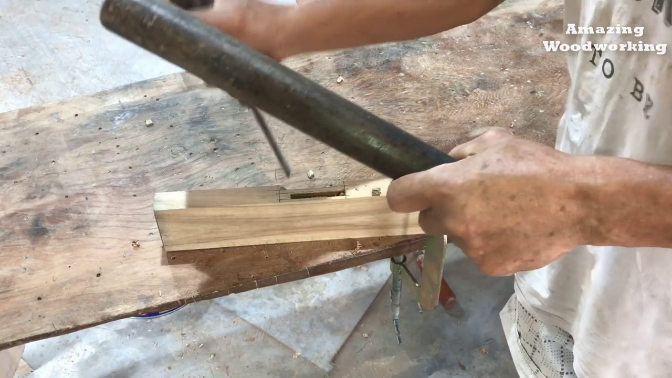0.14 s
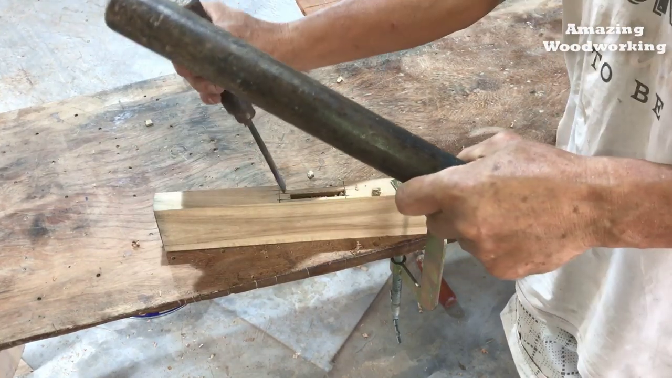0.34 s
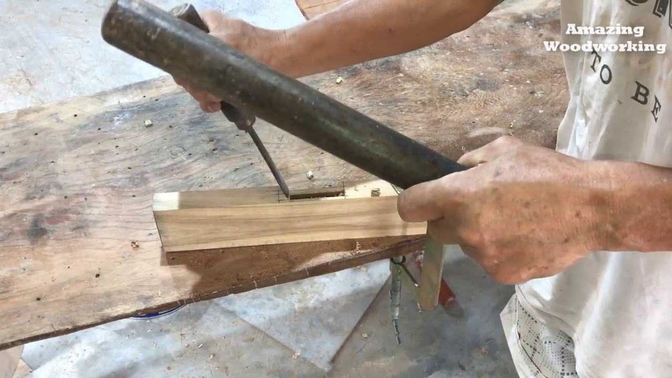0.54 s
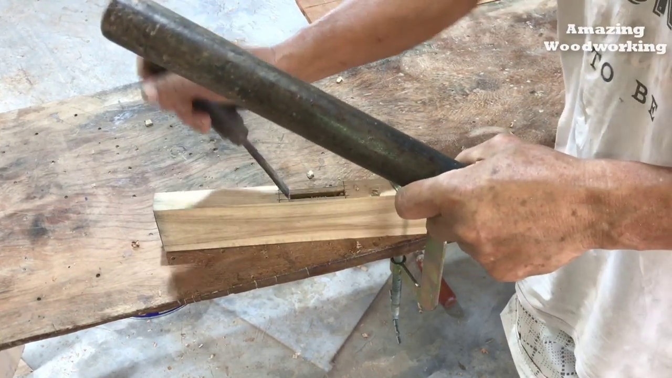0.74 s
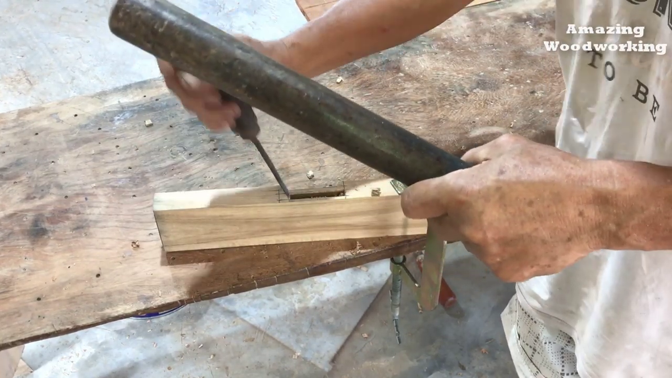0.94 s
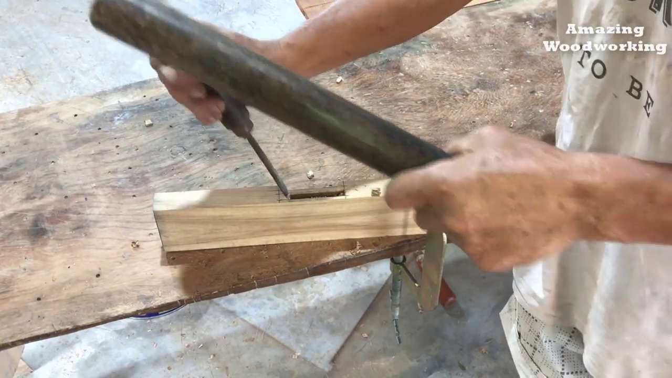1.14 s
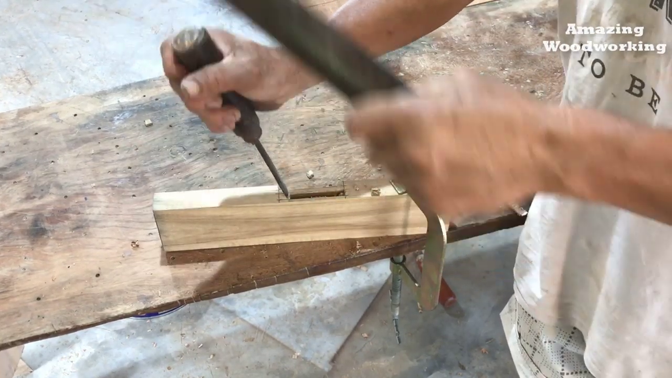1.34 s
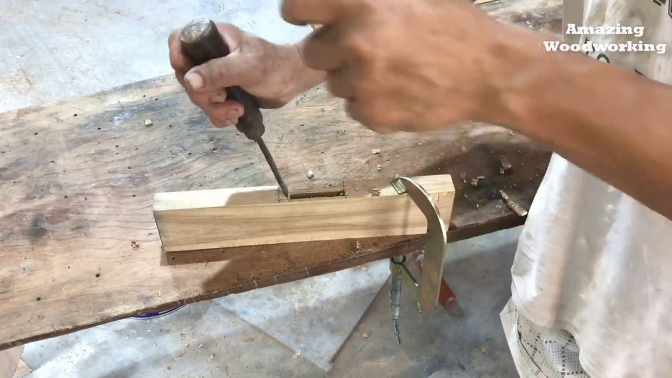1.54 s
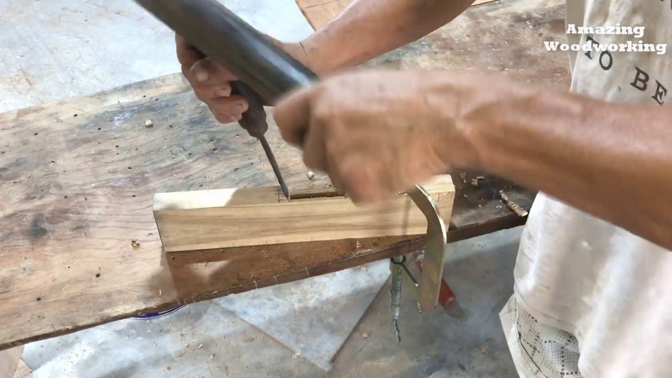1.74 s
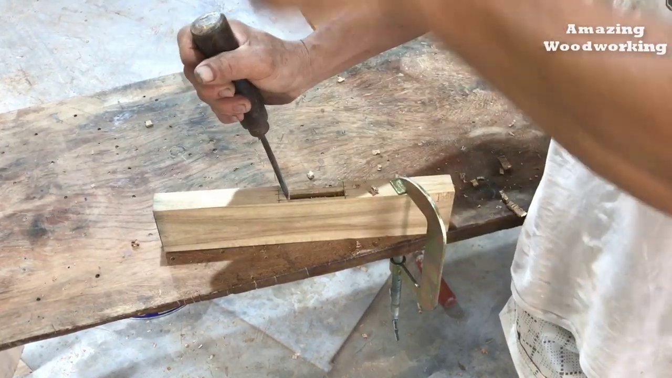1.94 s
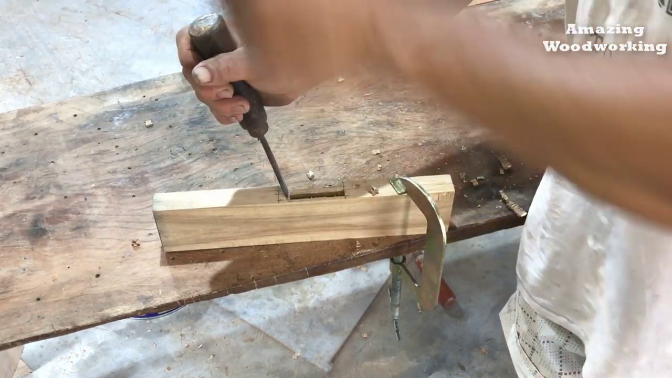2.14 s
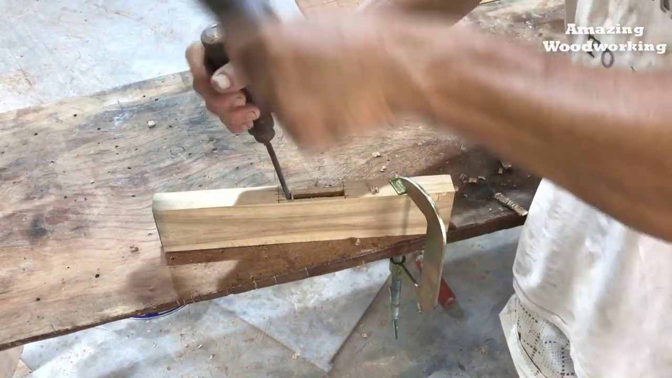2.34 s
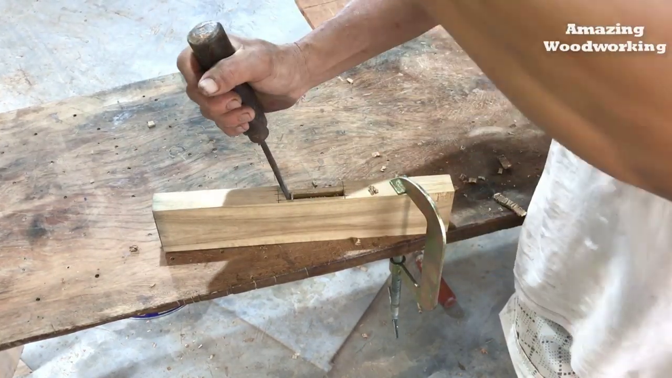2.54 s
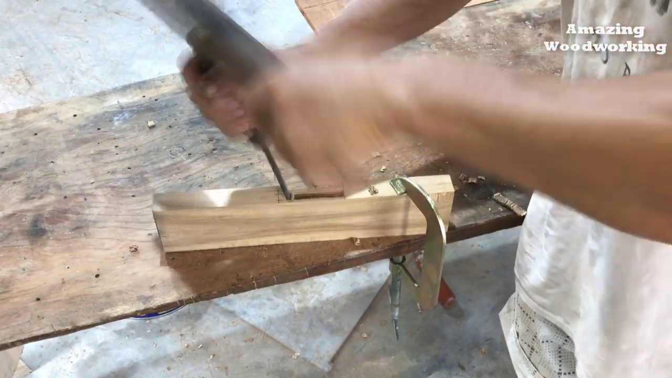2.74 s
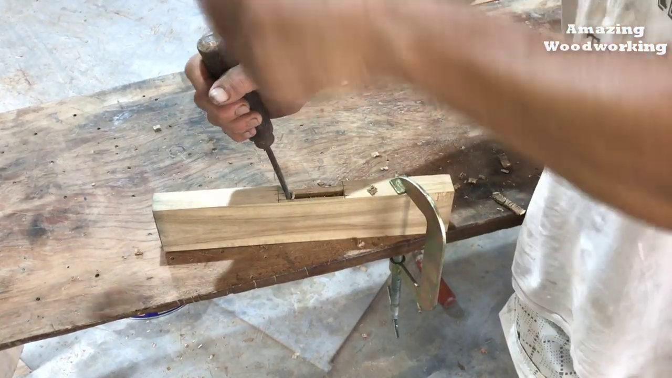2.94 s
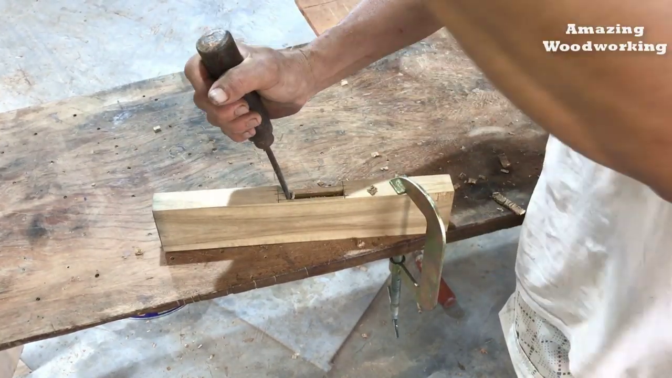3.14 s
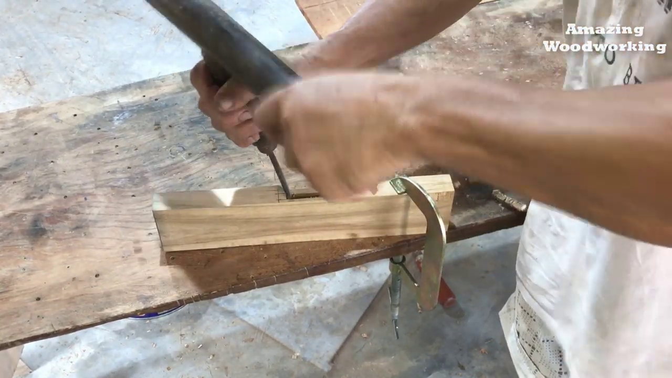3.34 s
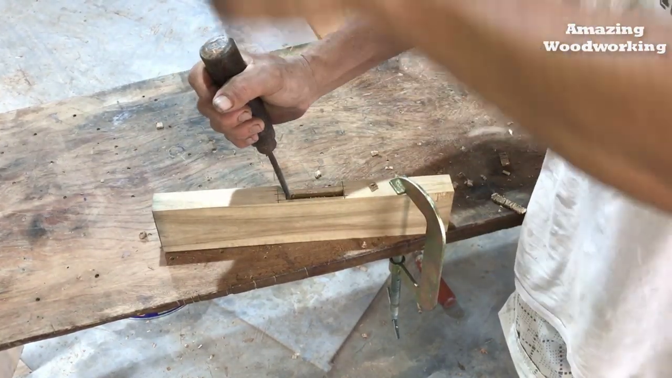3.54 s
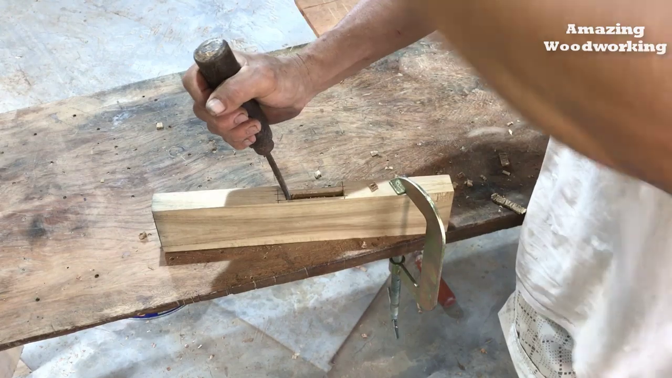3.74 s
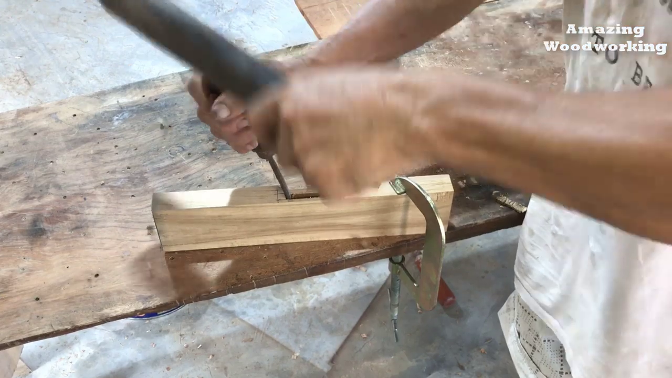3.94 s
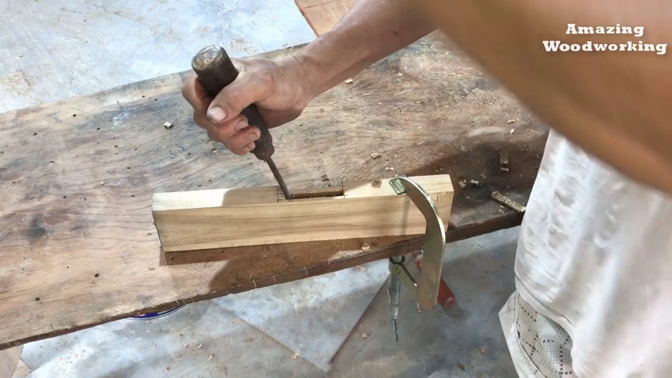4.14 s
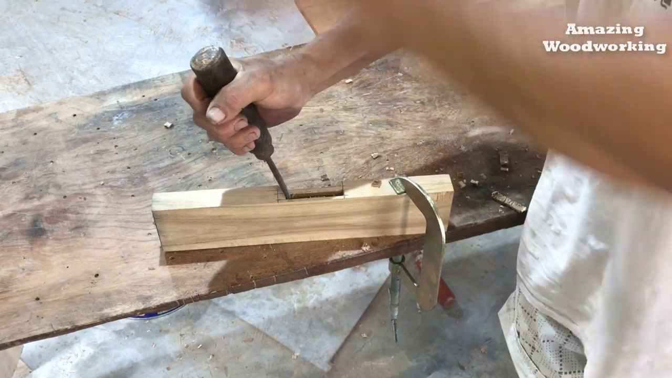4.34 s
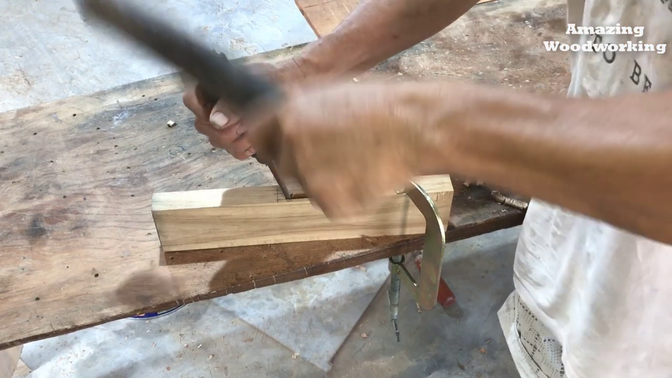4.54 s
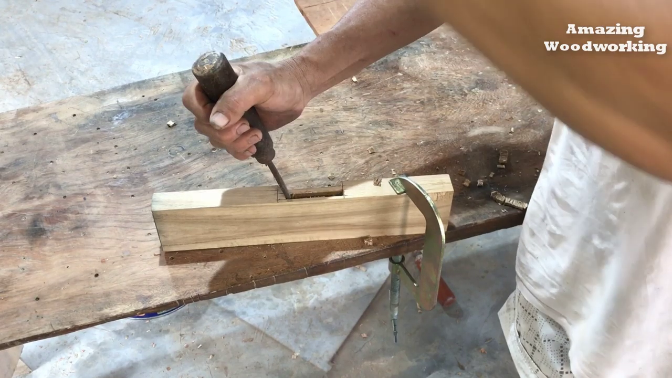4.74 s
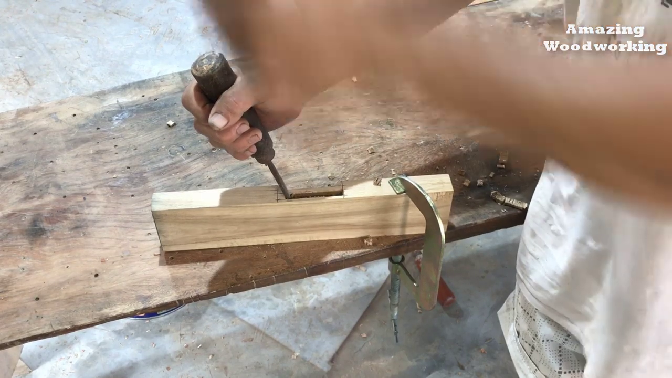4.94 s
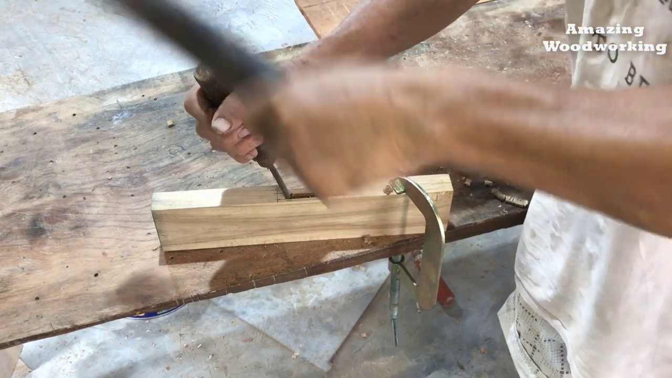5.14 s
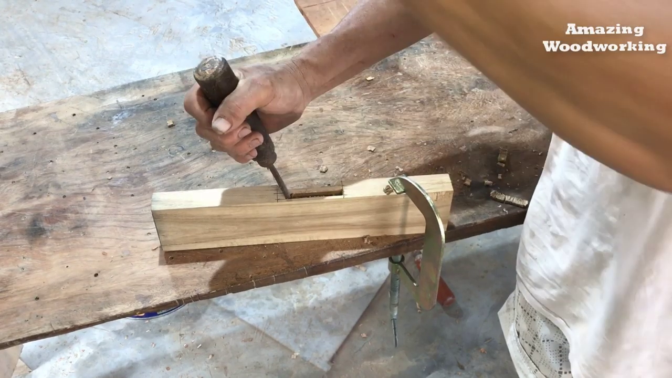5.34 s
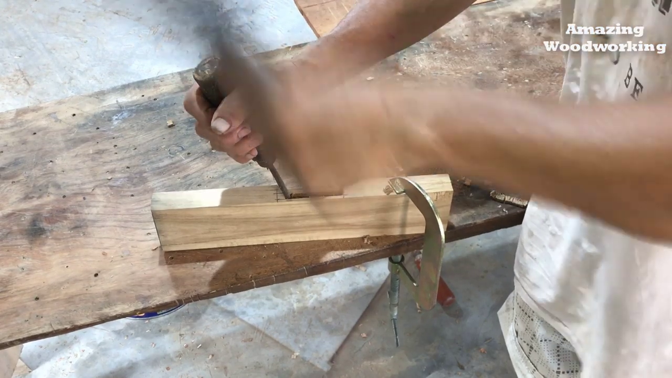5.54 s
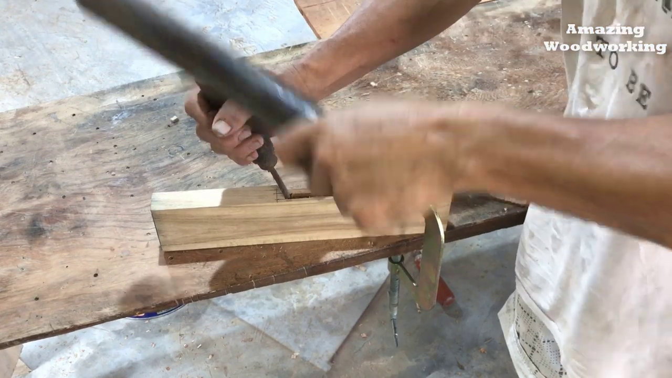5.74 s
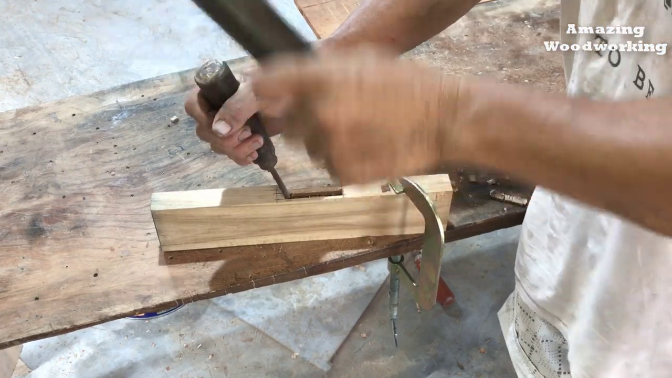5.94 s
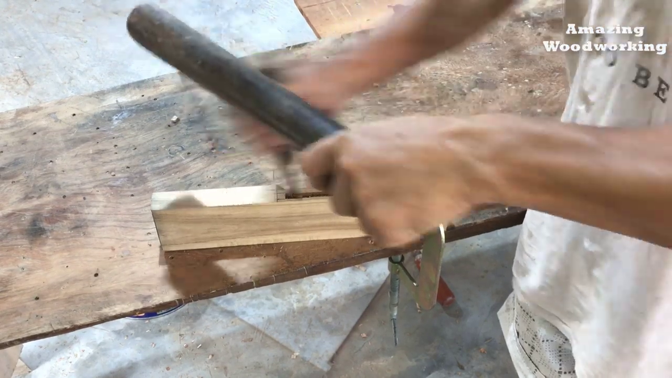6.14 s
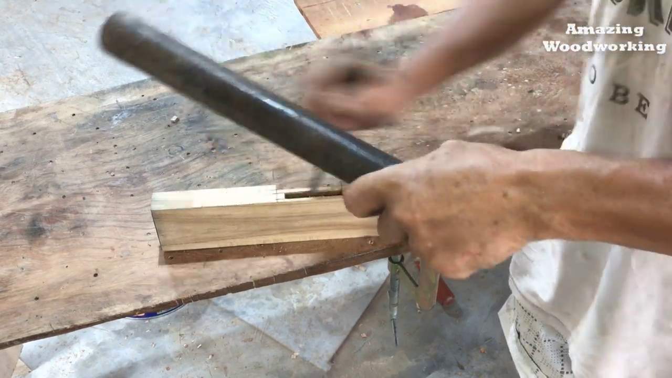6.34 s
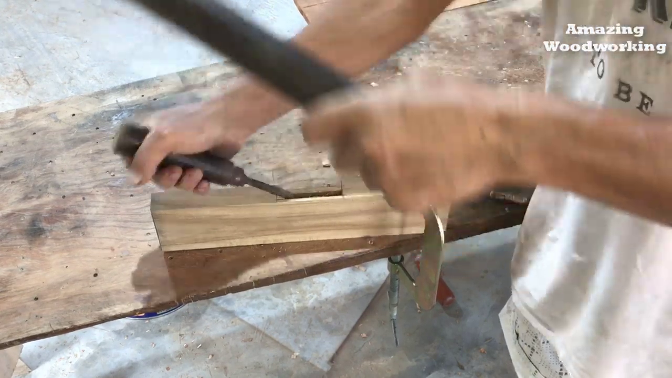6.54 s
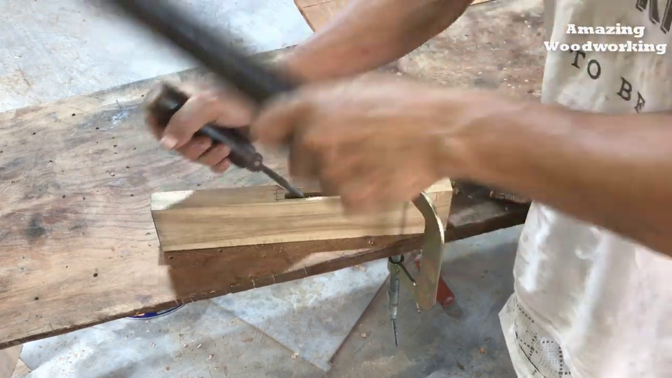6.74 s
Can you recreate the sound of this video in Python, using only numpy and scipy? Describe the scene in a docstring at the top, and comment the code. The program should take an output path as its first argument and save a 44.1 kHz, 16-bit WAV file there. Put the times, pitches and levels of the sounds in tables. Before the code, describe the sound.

A close microphone above a timber bench in a hard-walled workshop picks up soft air, low rumble and a thin far whine. At 0 to 0.25 s a very faint, distant two-note hoot rises slightly in pitch. Light, dull touches of a chisel on wood come at about 0.25, 0.35 and 0.65 s, with low rustles of arm movement around 1.1 to 1.5 s. From 1.7 s a heavy bar hits the chisel nine times, roughly every 0.55 s until 6.05 s. Each loud blow is an abrupt crack with a short, pitched knock, handle ring, glinting steel and a slightly delayed low bench boom, then half a second of room tail. The first and ninth are more glancing and metallic; the background ducks after the peaks. At 6.45 s the blade levers with a short woody crunch, and at 6.8 s a much weaker strike follows with little boom.

```python
"""A faint far hoot in two notes is heard over soft air, low rumble and far whine, then dull rustles.
A wooden-handled chisel is set in the slot of timber clamped on a bench, in a hard-walled workshop.
A heavy bar strikes it nine times; it is levered against a chip and struck once more.
Each blow is a crack driving resonances of bar, handle and blade, and a delayed boom of decaying bench modes.
Noise bands make the background; the recorder's gain drops at loud peaks, ducking the far whine."""
import sys
import numpy as np
from scipy import signal
from scipy.fft import rfft, irfft
from scipy.io import wavfile

SR = 44100
rng = np.random.default_rng(int(sys.argv[2]) if len(sys.argv) > 2 else 0)


def file_out(sig):
    """Save sig as 16-bit WAV at sys.argv[1]."""
    # one column per channel
    cols = np.atleast_2d(sig).T
    # limit, then scale
    lim = np.clip(cols, -1, 1)
    pcm = np.round(lim * 32767).astype(np.int16)
    wavfile.write(sys.argv[1], SR, pcm)


N = 304272
TIME = np.arange(N) / SR
AGE = TIME[:SR]   # one second of time since a contact

# Spectrum of the background air: frequency_hz, relative_density_db (per Hz)
AIR_SPECTRUM = [(30, -3.5), (90, 0), (170, -8.5), (300, -12.5), (500, -19), (1000, -21.5), (2300, -27.5),
                (5200, -24), (7500, -32.5), (10400, -33), (13000, -33), (16000, -36)]
# Noise bands of the far whine: centre_hz, width_hz (of each of two filter passes), rms_level_db
WHINE_BANDS = [(1644, 390, -63), (3240, 560, -59), (4555, 170, -55.5)]
# Notes of the faint far hoot: middle_s, half_length_s, pitch_hz, relative_level_db
HOOT_NOTES = [(0.017, 0.029, 548, -52.5), (0.18, 0.074, 601, -56)]
# Dull rustles as the arms shift: middle_s, half_length_s, level_db (at the middle)
ARM_RUSTLES = [(0.055, 0.11, -56.5), (1.111, 0.03, -50.5), (1.216, 0.071, -52.5), (1.497, 0.13, -56.5)]
# Reverberation of the workshop: frequency_hz, t60_s
ROOM_DECAY = [(100, 0.8), (400, 0.65), (1500, 0.56), (3000, 0.53), (6000, 0.61), (10000, 0.53),
              (16000, 0.44)]
# Light touches of the blade in the slot: start_s, relative_level_db, brightness_db_per_octave,
# length_s (decay time of the snaps)
BLADE_TOUCHES = [(.238, -42.5, 2, 0.0019), (.335, -41.5, -2.5, 0.084), (0.667, -37.5, -4, 0.0019),
                 (1.142, -61, 7, 0.028), (6.456, -30, 3, 0.009), (6.466, -24, -1, 0.035)]
# Resonances of the timber round the slot: frequency_hz, width_hz, relative_level_db
SLOT_MODES = [(182, 24, 15), (315, 26, 15), (1100, 77, 22), (1140, 54, 6), (1580, 48, 5), (2000, 40, 1)]
# Spectrum of the crack of a contact: frequency_hz, relative_level_db
CRACK_SPECTRUM = [(30, -8.5), (70, -2), (130, 2), (330, 1), (520, -6), (700, -2), (980, -6), (1200, -2.5),
                  (2500, 0.5), (3600, -8), (4400, -10.5), (6200, -14), (8000, -18.5), (10400, -21),
                  (12000, -15.5), (15000, -14.5)]
# Resonances of the chisel handle: frequency_hz, width_hz, relative_level_db
HANDLE_MODES = [(2845, 50, 3), (2890, 35, 5), (2925, 28, 9), (3015, 35, 8), (3550, 200, -3)]
# Resonances of the steel blade: frequency_hz, width_hz, relative_level_db
BLADE_MODES = [(6099, 26, -1), (6190, 26, 0), (6290, 30, -2), (7257, 10, 0), (8037, 6, 3), (8694, 14, 6.5),
               (8790, 16, 2), (10933, 30, -4), (13727, 30, -5), (14632, 30, 1), (14695, 22, 3)]
# Modes of the bench and timber: nominal_frequency_hz, relative_level_db, t60_s
BENCH_MODES = [(33, -17, 0.26), (123.5, -2.5, 0.27), (178.5, -13, 0.41), (208.4, -6.5, 0.25),
               (231.7, -10, 0.22), (316, -14.5, 0.23), (410.3, -9, 0.22), (441.6, -21, 0.34),
               (620, -32, 0.6), (110.7, -45, 5.1), (136, -42, 3.5), (178.6, -44, 4.1)]
# Hammer blows: start_s, relative_force_db, knock_pitch_hz, off_centre (0 to 1),
# bench_share_db (relative), blade_top_db (relative, modes above 12 kHz)
HAMMER_BLOWS = [(1.7216, 1.5, 1225, 0.94, 0.5, 6), (2.2152, 1, 1330, .1, 0, 6),
                (2.764, 5.5, 1487, 0.03, -2, -1), (3.3207, 3.5, 1476, 0.3, 0, 7),
                (3.8735, 3.5, 1460, 0.2, 2.5, 4), (4.434, 3, 1390, 0.06, 1, 7),
                (5.0124, 3.5, 1290, 0.1, 3, 0), (5.5860, 5, 1350, 0, 1.5, -4), (6.0570, -1, 1540, 1, 2, 14),
                (6.8215, -10.5, 1200, 0.26, -16, 0)]

# a duller touch sits deeper in the slot and rings the wood more: dB, dB lost per dB/octave of brightness
SLOT_RING_DB, SLOT_RING_LOSS_DB = -16, 2.5
# a harder blow is brighter and booms more: dB at force 0, dB per dB of force
TREBLE_DB, TREBLE_PER_FORCE = -1.5, 0.65
BOOM_DB, BOOM_PER_FORCE = -1.5, 1
# a square blow sounds bar and handle, an off-centre one bends the blade:
# dB when square, change in dB when fully off centre
KNOCK_DB, KNOCK_OFF_DB = 4.5, -3.5
HANDLE_DB, HANDLE_OFF_DB = 6.5, -11.5
BLADE_DB, BLADE_OFF_DB = 4.5, 9.5


def from_db(db):
    """Logarithmic level: 20 dB is a factor of ten in amplitude."""
    return 10 ** (np.asarray(db) / 20)


def rms_one(x):
    """Normalisation: scale a signal to unit root-mean-square amplitude."""
    return x / np.sqrt(np.mean(x ** 2) + 1e-20)


def at_hz(points, hz):
    """Interpolation: read a table on a log-frequency axis."""
    table_hz, value = np.transpose(points)
    return np.interp(np.log(hz + 1e-9), np.log(table_hz), value)


def add(out, start_s, sound):
    """Superposition: mix a sound in at its starting time."""
    at = max(round(start_s * SR), 0)
    out[at:at + len(sound)] += sound[:N - at]


def band(x, low_hz, high_hz):
    """Band limitation by a Butterworth band-pass."""
    edges = [low_hz, min(high_hz, SR / 2 - 1)]
    return signal.sosfilt(signal.butter(2, edges, "band", fs=SR, output="sos"), x)


def resonate(x, hz, width_hz):
    """Resonance: a pole pair whose radius sets the bandwidth, with about unit gain at its peak."""
    radius = np.exp(-np.pi * width_hz / SR)
    feedforward = np.array([1, 0, -1]) * (1 - radius * radius) / 2
    feedback = [1, -2 * radius * np.cos(2 * np.pi * hz / SR), radius * radius]
    return signal.lfilter(feedforward, feedback, x + 1e-18)


def ringing(x, modes):
    """Modal superposition: the sum of resonances driven by one sound."""
    return sum(from_db(db) * resonate(x, hz, width_hz) for hz, width_hz, db in modes)


def swell(middle_s, half_length_s):
    """Gaussian envelope: a smooth rise and fall round a middle time."""
    return np.exp(-((TIME - middle_s) / half_length_s) ** 2)


def background(air_db=-53, rumble_db=-45):
    """Spectral shaping of noise: soft air, a steady low rumble and narrow bands of far whine."""
    white = rng.standard_normal((3, N))
    air_gain = from_db(at_hz(AIR_SPECTRUM, np.fft.rfftfreq(N, 1 / SR)))
    air = from_db(air_db) * rms_one(irfft(rfft(white[0]) * air_gain, N))
    rumble = from_db(rumble_db) * rms_one(band(white[1], 26, 62))
    whine = np.zeros(N)
    for hz, width_hz, db in WHINE_BANDS:
        narrow = resonate(resonate(white[2], hz, width_hz), hz, width_hz)
        whine += from_db(db) * rms_one(narrow)
    return air + rumble + whine


def hoots(width_hz=22, harmonics_db=(-2, -3, -5)):
    """Harmonic series: three narrow noise bands at multiples of a far pitch, blurred by distance."""
    out, white = np.zeros(N), rng.standard_normal(len(AGE))
    for middle_s, half_length_s, pitch_hz, db in HOOT_NOTES:
        note = np.zeros(len(AGE))
        for k, part_db in enumerate(harmonics_db, 1):
            narrow = resonate(resonate(white, k * pitch_hz, width_hz), k * pitch_hz, width_hz)
            note += from_db(part_db) * rms_one(narrow)
        add(out, 0, from_db(db) * swell(middle_s, half_length_s)[:len(note)] * note)
    return out


def rustles(low_hz=190, high_hz=430):
    """Friction noise: soft low-band rubbing swells as the grip changes."""
    rubbing = rms_one(band(rng.standard_normal(N), low_hz, high_hz))
    envelope = sum(from_db(db) * swell(middle_s, half_s) for middle_s, half_s, db in ARM_RUSTLES)
    return rubbing * envelope


def click(level_db):
    """Minimum phase: the most compact causal pulse with a given spectrum, by folding its cepstrum."""
    cepstrum = irfft(np.log(from_db(level_db)), len(AGE))
    cepstrum[1:] *= 2 * (AGE[1:] < .5)
    return irfft(np.exp(rfft(cepstrum)), len(AGE))


def workshop(walls, direct_db=-9, early_s=0.043, late_db=-13, build_s=0.0031, same=0.62, lump_s=.003):
    """Room impulse response: a direct path, lumpy early reflections and a tail decaying by band."""
    # the moving arm changes part of the reflections; same is the lasting share of their power
    white = np.sqrt(same) * walls + np.sqrt(1 - same) * rng.standard_normal(walls.shape)
    edges = np.geomspace(40, 19000, 15)
    lumps_db = 3 * np.interp(AGE / lump_s, np.arange(len(AGE)), rng.standard_normal(len(AGE)))
    early = np.exp(-(AGE / early_s) ** 1.08) * from_db(lumps_db)
    out = np.zeros(len(AGE))
    for k, (low_hz, high_hz) in enumerate(zip(edges, edges[1:])):
        t60_s = at_hz(ROOM_DECAY, np.sqrt(low_hz * high_hz))
        tail = from_db(late_db) * np.exp(-np.log(1000) * AGE / t60_s)
        out += band(white[k % 2], low_hz, high_hz) * np.hypot(early, tail)
    out *= 1 - np.exp(-AGE / build_s)
    out /= np.linalg.norm(out)
    out[0] += from_db(direct_db)
    return out


def touches(walls, touch_db=30, pivot_hz=1500):
    """Impulsive excitation: as the edge is set or levered, snapping fibres ring the wood round the slot."""
    out, hz = np.zeros(N), np.fft.rfftfreq(len(AGE), 1 / SR)
    room = workshop(walls, direct_db=-2.5)
    for start_s, db, tilt_db, length_s in BLADE_TOUCHES:
        # cubing the noise makes it sparse and snappy
        snaps = rng.standard_normal(len(AGE)) ** 3 * np.exp(-AGE / max(length_s, 1e-3))
        tilt = tilt_db * np.log2(np.maximum(hz, 400) / pivot_hz)   # level below 400 Hz
        wood = click(at_hz(CRACK_SPECTRUM, hz) + tilt)
        contact = signal.fftconvolve(snaps / np.linalg.norm(snaps), wood)[:len(AGE)]
        slot_gain = from_db(SLOT_RING_DB - SLOT_RING_LOSS_DB * tilt_db)
        sound = contact + slot_gain * ringing(contact, SLOT_MODES)
        add(out, start_s, from_db(touch_db + db) * signal.fftconvolve(sound, room))
    return out


def chisel(knock_hz, knock_db, handle_db, treble_db, blade_db, top_db, spread_db=1.0):
    """Impact excitation: a broad crack drives the bar's knock, the short handle ring and long blade ring."""
    hz = np.fft.rfftfreq(len(AGE), 1 / SR)
    treble = at_hz([(2800, 0), (7500, treble_db)], hz)   # a shelf between the two frequencies
    crack = click(at_hz(CRACK_SPECTRUM, hz) + treble)
    knock = from_db(knock_db) * resonate(crack, knock_hz, 150)
    handle = from_db(handle_db) * ringing(crack, HANDLE_MODES)
    # the angle of the blow decides how much the blade's highest modes take up
    blade_modes = []
    for mode_hz, width_hz, db in BLADE_MODES:
        take_up_db = top_db if mode_hz > 12000 else blade_db
        blade_modes.append((mode_hz, width_hz, db + spread_db * rng.normal() + take_up_db))
    return crack + knock + handle + ringing(crack, blade_modes)


def bar_knock(knock_hz, t60_s=0.066):
    """Direct sound: the bar is near the microphone, so its decaying sine arrives clean, ahead of the room."""
    return np.sin(2 * np.pi * knock_hz * AGE) * np.exp(-np.log(1000) * AGE / t60_s)


def bench(lag_s=0.00479, rise_s=0.0037, spread_db=2.0, detune=0.0099):
    """Damped modal vibration: the heavy bench takes up the blow a moment later and booms."""
    t = np.maximum(AGE - lag_s, 0)
    out = np.zeros(len(t))
    for k, (hz, db, t60_s) in enumerate(BENCH_MODES):
        swing = np.sin(2 * np.pi * hz * (1 + detune * rng.normal()) * t)
        gain = (-1) ** k * from_db(db + spread_db * rng.normal())   # neighbours in opposite phase
        out += gain * swing * np.exp(-np.log(1000) * t / t60_s)
    return out * (1 - np.exp(-t / rise_s))


def hammering(walls, chisel_db=36, bar_db=-1, bar_off_db=-6):
    """Mode excitation by impact: force and aim set how chisel, bar and bench share each blow."""
    out = np.zeros(N)
    for start_s, force_db, knock_hz, off_centre, bench_db, top_db in HAMMER_BLOWS:
        strike = chisel(knock_hz,
                        knock_db=KNOCK_DB + KNOCK_OFF_DB * off_centre,
                        handle_db=HANDLE_DB + HANDLE_OFF_DB * off_centre,
                        treble_db=TREBLE_DB + TREBLE_PER_FORCE * force_db,
                        blade_db=BLADE_DB + BLADE_OFF_DB * off_centre,
                        top_db=top_db)
        in_room = signal.fftconvolve(strike, workshop(walls))
        bar_gain = from_db(bar_db + bar_off_db * off_centre + force_db)
        boom_gain = from_db(BOOM_DB + BOOM_PER_FORCE * force_db + bench_db)
        add(out, start_s, from_db(chisel_db + force_db) * in_room)
        add(out, start_s, bar_gain * bar_knock(knock_hz))
        add(out, start_s, boom_gain * bench())
    return out


def scene():
    """Superposition of all sources at one microphone above the bench."""
    walls = rng.standard_normal((2, len(AGE)))   # the room's lasting pattern of reflections
    return (background() + hoots() + rustles() + touches(walls) + hammering(walls))[None]


def gain_control(x, threshold_db, release_db_per_s, attack_s=0.00016):
    """Peak limiting: peaks over the threshold pull the gain down fast; it creeps back between blows."""
    over_db = np.maximum(20 * np.log10(np.abs(x) + 1e-9) - threshold_db, 0)
    # a running maximum on a rising ramp lets each held peak fall at the release rate
    ramp_db = release_db_per_s * TIME
    held_db = np.maximum.accumulate(over_db + ramp_db, axis=-1) - ramp_db
    smoothing = np.exp(-1 / (attack_s * SR))
    return x * from_db(-signal.lfilter([1 - smoothing], [1, -smoothing], held_db))


def record(dry):
    """Recorder response: gain control, soft saturation of peaks and a steep top cut."""
    level = gain_control(dry, threshold_db=5.5, release_db_per_s=18.5)
    rounded = level / (1 + (level / .82) ** 4) ** (1 / 4)   # approaches 0.82 at most
    top_cut = signal.ellip(10, .2, 90, 15700, fs=SR, output="sos")   # ripple dB, stop dB, cutoff Hz
    return signal.sosfilt(top_cut, rounded)


dry = scene()
out = record(dry)
file_out(out)
```